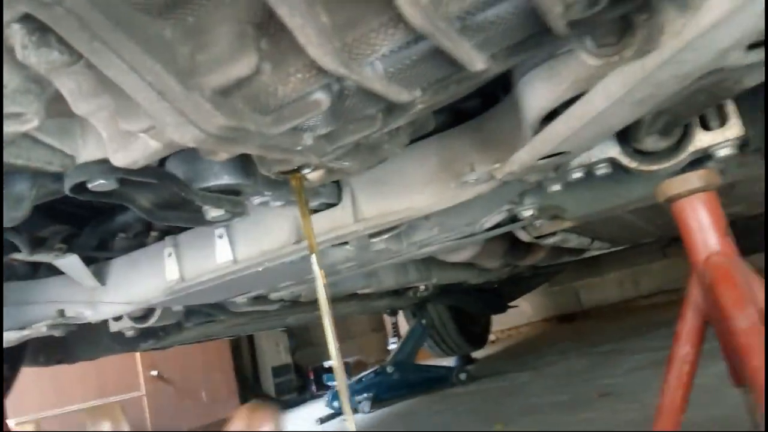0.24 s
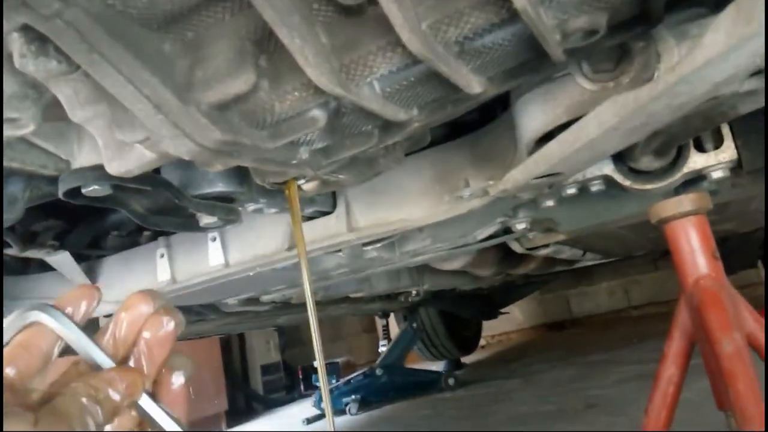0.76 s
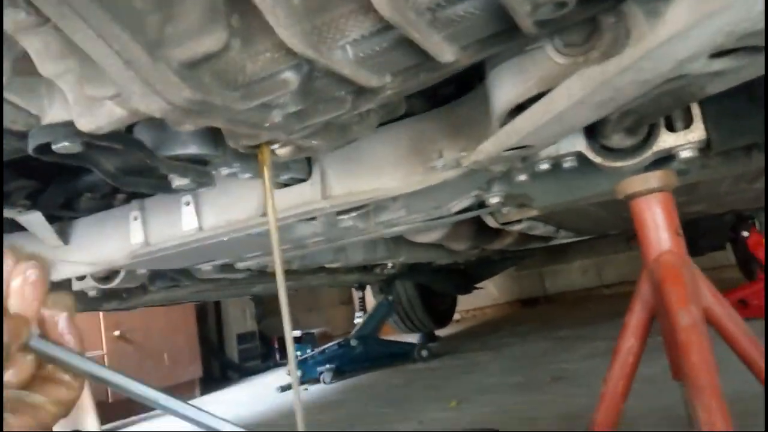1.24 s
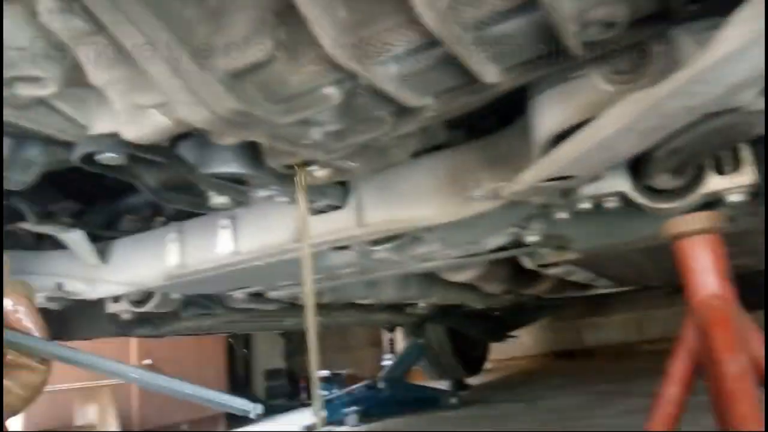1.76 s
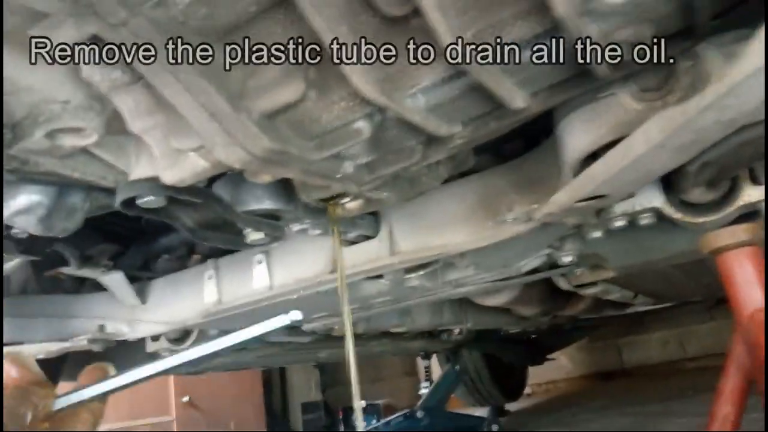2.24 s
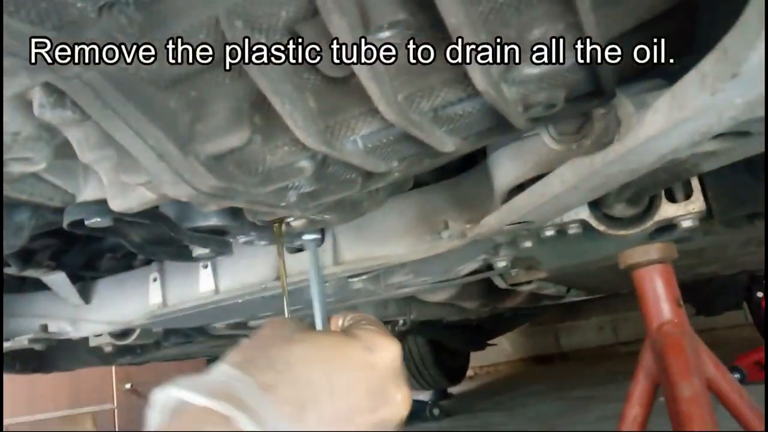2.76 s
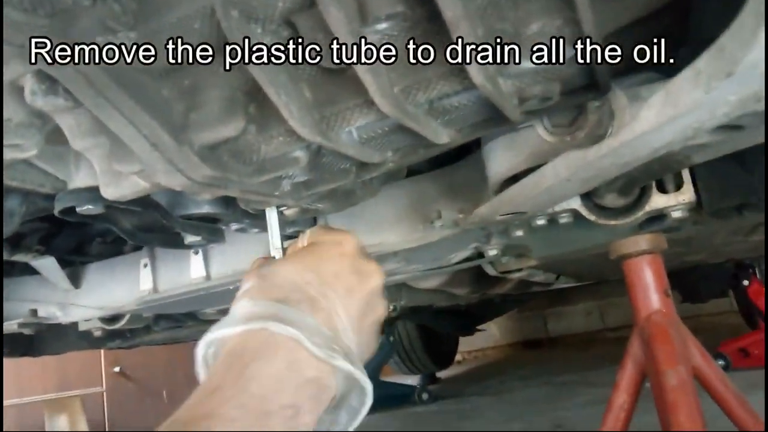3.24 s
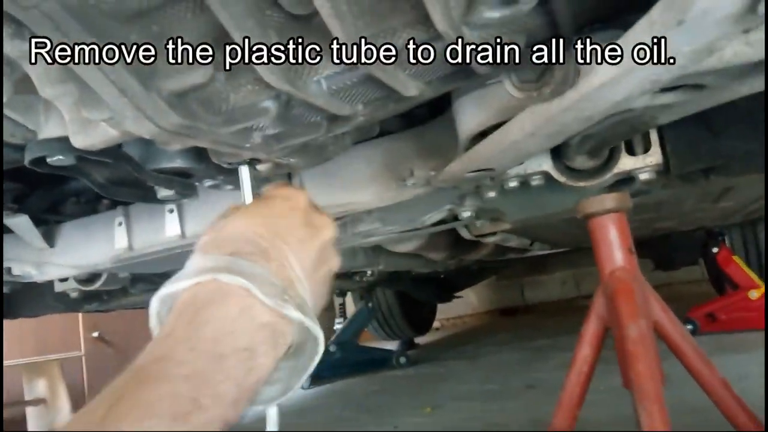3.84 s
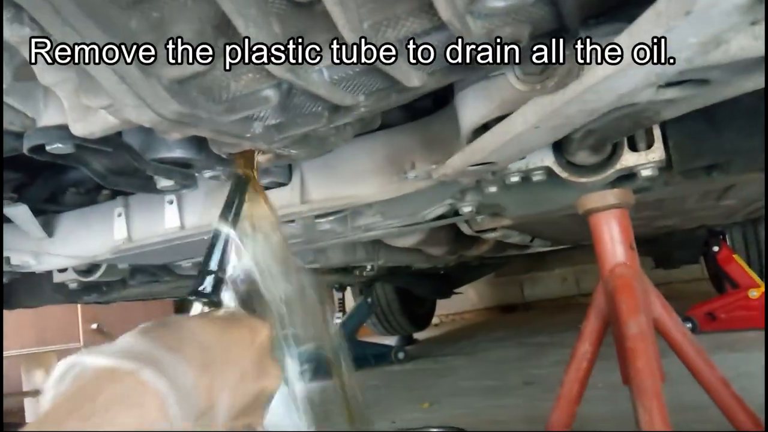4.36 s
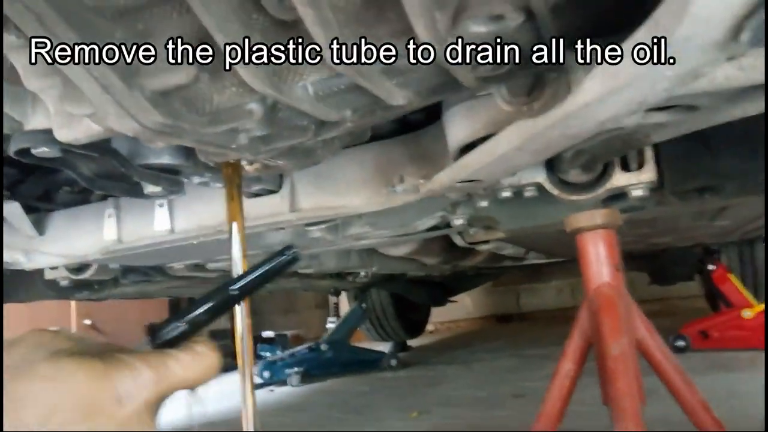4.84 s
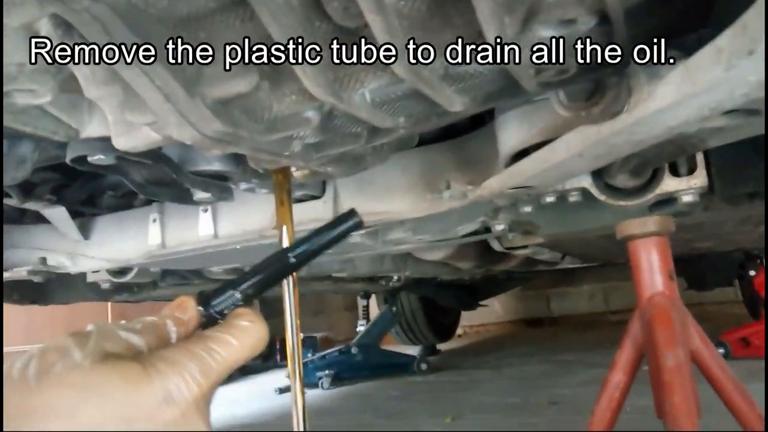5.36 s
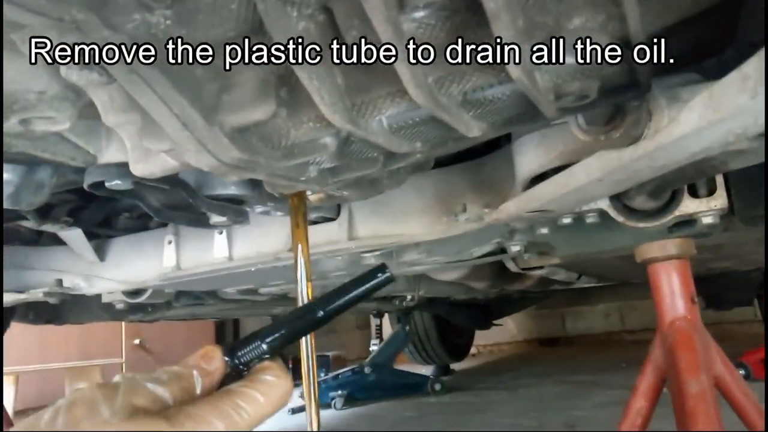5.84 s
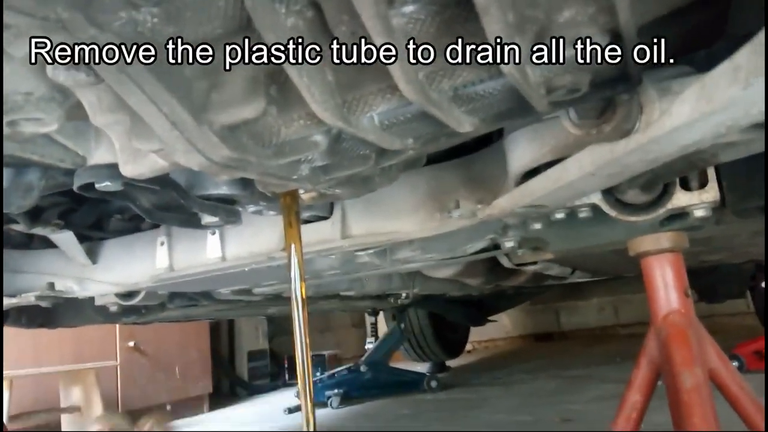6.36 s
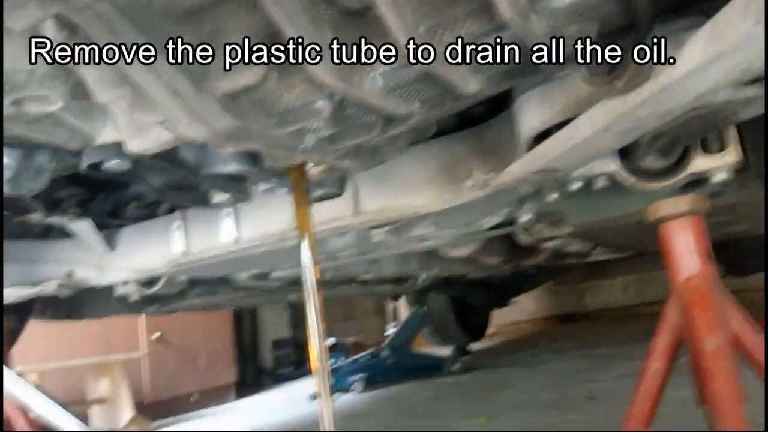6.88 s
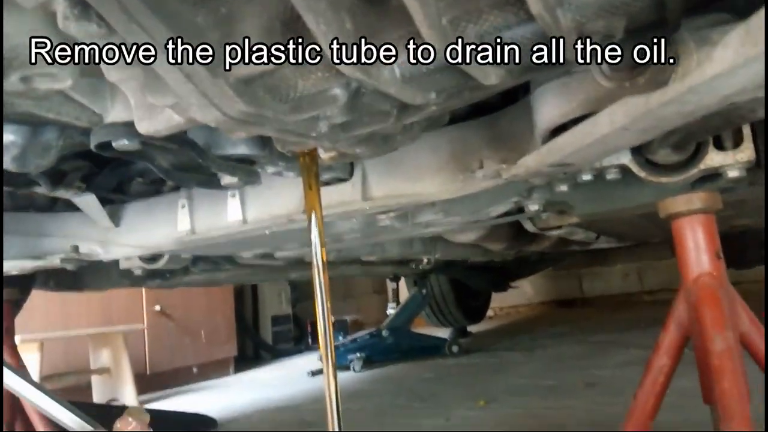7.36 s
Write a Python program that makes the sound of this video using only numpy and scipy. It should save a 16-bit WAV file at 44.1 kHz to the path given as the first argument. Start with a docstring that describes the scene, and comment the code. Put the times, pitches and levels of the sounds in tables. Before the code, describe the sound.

A nearby stereo microphone, fuller in bass on the left, catches oil draining in a small, dull garage. Sharp ticks and splatters swell over a drumming pan, then thin abruptly. After a bright metal clink, faint glove rustles and small scrapes, gritty plastic snaps precede a brief splashy gush. Low plops and bubbles follow, thinning to a quiet pour with slight hiss.

```python
"""In a garage, heard from under a car, oil drains from a gearbox into a pan.
A thin stream fizzes, spatters and drums; a hex key clinks into the drain hole and unscrews a plastic tube.
The tube comes out with a gush, and a thicker stream gurgles and then runs smooth, over a low hum.
The liquid is built from showers of short noise bursts and gliding tones, the pan and key from dying modes,
the tube from gritty noise through resonances, the hand and air from coloured noise, the hum from wavering sines."""
import sys
import numpy as np
from scipy import signal
from scipy.fft import rfft, irfft, next_fast_len
from scipy.io import wavfile

SR = 44100
rng = np.random.default_rng(int(sys.argv[2]) if len(sys.argv) > 2 else 0)


def transcribe(u):
    """Save the signal u as a 16-bit wav file named by the first command-line argument.

    u: samples, shape (n,) or (channels, n), limited to [-1, 1]; the rate is SR.
    q: integer samples, one column per channel.
    """
    v = np.clip(np.atleast_2d(u).T, -1, 1)
    q = np.round(v * 32767).astype(np.int16)
    wavfile.write(sys.argv[1], SR, q)


N = 335851
T = np.arange(N) / SR
SHORT = T[:6000]  # time axis of one short sound

# All levels are relative: the layer trims and the output gain come on top.
# modes of the pan: (frequency [Hz], level [dB], t60 [s])
PAN_MODES = [(256, -7, 0.08), (293, -10, 0.032), (368, -10, 0.054), (829, -5, 0.078), (877, 0.5, 0.051),
             (1036, -1, 0.04), (1156, -10, 0.069), (1490, -15.5, 0.13), (1810, -17, 0.14)]
# colour of splashing oil: (frequency [Hz], level [dB])
SPLASH_COLOUR = [(200, -28), (600, -1), (1100, -3.5), (1600, 2), (6000, 2.5), (10400, 6.5), (12000, -9),
                 (16000, -23)]
# the spatter comes in clumps: depth [dB] and random steps per second
CLUMP_DB, CLUMPS_PER_S = 2.8, 32


def amp(db):
    """Turns decibels into a linear gain."""
    return 10 ** (np.asarray(db) / 20)


def unit(x):
    """Scales to rms 1."""
    return x / np.sqrt(np.mean(x ** 2) + 1e-30)


def add(mix, s, sound):
    """Mixes a stereo sound in at time s."""
    part = mix[:, max(round(s * SR), 0):][:, :sound.shape[1]]
    part += sound[:, :part.shape[1]]


def level(rows):
    """Gain along a dB curve, fading out over 50 ms beyond its ends."""
    s, db = np.transpose(rows)
    beyond = np.maximum(np.maximum(s[0] - T, T - s[-1]), 0)
    return amp(np.interp(T, s, db)) * np.maximum(1 - beyond / .05, 0)


def swells(rows):
    """Gain of smooth swells, each given by its middle, level and length."""
    return sum(amp(db) * np.exp(-(2 * (T - s) / length) ** 2) for s, db, length in rows)


def drift(per_s):
    """A slow random curve of straight lines between normal random knots."""
    knots = rng.standard_normal(2000)
    return np.interp(T * per_s, np.arange(len(knots)), knots)


def decay(t60, rise):
    """A quick rise and an exponential fall."""
    return (1 - np.exp(-(SHORT / rise) ** 2)) * amp(-60 * SHORT / max(t60, .003))


def hump(hz, centre_hz, spread):
    """Gain of a broad resonance, spread in octaves."""
    octaves = np.log2((hz + 1) / centre_hz)
    return (1 + (octaves / spread) ** 2 / np.sqrt(2)) ** -np.sqrt(2)


def colour(x, points, centre_hz=None, spread=1):
    """Filters by a spectrum and, if given, a broad resonance."""
    size = next_fast_len(x.shape[-1])
    hz = np.fft.rfftfreq(size, 1 / SR)
    point_hz, db = np.transpose(points)
    gain = amp(np.interp(np.log(hz + 1), np.log(point_hz), db))
    if centre_hz:
        gain = gain * hump(hz, centre_hz, spread)
    return irfft(rfft(x, size) * gain, size)[..., :x.shape[-1]]


def noise(points):
    """Steady coloured noise, unrelated in the two ports."""
    return unit(colour(rng.standard_normal((2, N)), points))


def ring(modes, rise):
    """Dying modes, each reaching the two ports at its own phase."""
    out = 0
    for hz, db, t60 in modes:
        cycles = hz * SHORT + rng.random((2, 1))
        out = out + amp(db) * decay(t60, rise) * np.sin(2 * np.pi * cycles)
    return out


def shower(grains, per_s, size_db):
    """Each grain falls at random moments with random sizes; rms 1."""
    out = np.zeros((2, N))
    count = max(int(per_s * N / SR / len(grains)), 1)  # the grains share the rate
    for grain in grains:
        draws = rng.random((count, 2))
        clicks = np.zeros(N)
        # a positive size_db makes a few grains stand out, a negative one makes a few fall back
        clicks[(draws[:, 0] * N).astype(int)] = amp(-size_db * np.log(0.0043 + draws[:, 1]))
        out += signal.oaconvolve(clicks[None], grain, axes=1)[:, :N]
    return unit(out)


def tick(hz, spread):
    """A needle-sharp snap of an air pocket, followed by scattered reflections; peak 1."""
    # colour of the snaps: (frequency [Hz], level [dB])
    tick_colour = [(600, -21.5), (1550, 2.5), (2500, 3.5), (4400, 4), (9200, 11.5), (11000, -2.5),
                   (12500, -23), (16000, -28)]
    snap = amp(-60 * SHORT / .0025)
    reflections = .35 * decay(.016, rise=.0006) + .06 * decay(.05, rise=.003)
    burst = rng.standard_normal((2, len(SHORT))) * (snap + reflections)
    burst = colour(burst, tick_colour, hz, spread)
    return burst / abs(burst).max(axis=1, keepdims=True)


def splat(hz, spread, t60):
    """A sharp slap, smeared by close reflections between pan, floor and underbody."""
    slap = 1.5 * decay(.014, rise=.0013)
    burst = rng.standard_normal((2, len(SHORT))) * (slap + decay(t60, rise=0.0029))
    burst = colour(burst, SPLASH_COLOUR, hz, spread)
    return burst / np.sqrt(np.mean(burst[:, :SR // 150] ** 2))  # rms 1 at the onset


def bubble(hz, rise, t60):
    """A ringing pocket of air whose pitch climbs; close reflections break up the glide."""
    octaves = np.minimum(rise * SHORT, 1)  # the bubble is gone after climbing an octave
    phase = 2 * np.pi * np.cumsum(hz * 2 ** octaves) / SR
    tone = (1 - octaves ** 10) * decay(t60, rise=.002) * np.sin(phase)
    echoes = rng.standard_normal((2, len(SHORT))) * decay(.04, rise=.002)
    echoes = echoes / np.linalg.norm(echoes[0])
    echoed = signal.fftconvolve(tone[None], echoes, axes=1)[:, :len(SHORT)]
    return .45 * tone + .8 * echoed


def background():
    """Room air as coloured noise, two motors humming in the building and a faint passing tone."""
    # colour of the room air: (frequency [Hz], level [dB])
    air_colour = [(30, -28.5), (86, -5), (161, -6.5), (303, -15), (364, -10.5), (554, -22), (780, -19.5),
                  (1810, -42), (9700, -40.5), (16000, -50.5)]
    # swells of the lower hum: (middle [s], level [dB], length [s])
    hum_swells = [(4.38, -73, 0.65), (6.35, -69.5, 0.6)]
    passing_tone = [(6.55, -69, .2)]  # (middle [s], level [dB], length [s])
    tones = [(96.5, amp(-76) + swells(hum_swells)),  # (frequency [Hz], gain)
             (116, amp(-72.5)),
             (447, swells(passing_tone))]
    hum = 0
    for hz, gain in tones:
        wavering_hz = hz + 0.94 * drift(per_s=2.6)
        hum = hum + gain * np.sin(2 * np.pi * np.cumsum(wavering_hz) / SR)
    return amp(5.0) * hum + amp(-68) * noise(air_colour)


def rubbing():
    """The gloved hand rubs as it works the key: soft swells of coloured noise."""
    # strokes of the glove: (middle [s], level [dB], length [s])
    rubs = [(0.348, -52.5, 0.055), (.52, -49, 0.17), (2.26, -49, 0.097), (2.588, -59.5, 0.049),
            (3.041, -57.5, 0.03), (3.15, -58.5, 0.12), (3.444, -60, 0.064), (3.58, -60.5, 0.09),
            (3.895, -61, 0.084), (4.029, -57, 0.04)]
    # colour of the rubbing: (frequency [Hz], level [dB])
    rub_colour = [(1500, -19.5), (3300, -11), (6000, -13), (8300, -4), (9800, 5), (10700, -3.5),
                  (11800, -17), (16000, -24)]
    return swells(rubs) * noise(rub_colour)


def tube():
    """Each knock in the seat is a short gritty rasp through the damped resonances of the plastic."""
    # catches and knocks: (time [s], level [dB], rasp length [s], t60 [s], favoured [Hz], spread [octaves])
    knocks = [(2.902, -46, 0.0066, 0.052, 1900, 1.26), (2.922, -56, 0.02, 0.051, 1300, 1.2),
              (4.186, -35, .011, 0.026, 4700, 0.58), (4.278, -36.5, 0.0067, 0.024, 5160, 1.7),
              (4.372, -44.5, 0.0054, 0.078, 7900, 1.13)]
    # broad resonances of the tube: (frequency [Hz], level [dB], spread [octaves])
    tube_modes = [(1090, 1.5, 0.43), (2425, 4, 0.11), (3210, 1.5, 0.063), (4250, -8, 0.17),
                  (6100, 5, 0.097), (9630, -5, 0.25), (13000, -1.5, 0.035)]
    grit_db, grains_per_s, swell_db = 3, 900, 7  # the rasp is gritty and grows, then dies away
    out, hz = np.zeros((2, N)), np.fft.rfftfreq(len(SHORT), 1 / SR)
    body = sum(amp(db) * hump(hz, mode_hz, spread) for mode_hz, db, spread in tube_modes)
    for s, db, length, t60, centre_hz, spread in knocks:
        swell = -swell_db * np.maximum(1 - SHORT / length, 0)
        fall = -60 * np.maximum(SHORT - length, 0) / t60
        roughness = amp(grit_db * drift(grains_per_s)[:len(SHORT)])
        grit = rng.standard_normal((2, len(SHORT))) * roughness
        rasp = unit(irfft(rfft(grit) * body * hump(hz, centre_hz, spread)))
        add(out, s, amp(db + swell + fall) * rasp)
    return out


def key():
    """Each contact with the drain hole is a short scrape that rings the key modes it favours."""
    # contacts: (time [s], level [dB], favoured [Hz], spread [octaves], ring level [dB])
    clinks = [(2.733, -29, 6550, 2.6, 8), (2.966, -42, 6760, 1.15, -31), (2.984, -47.5, 8000, 0.92, -25),
              (3.311, -35.5, 8800, 0.54, -21)]
    # modes of the key: (frequency [Hz], level [dB], t60 [s])
    key_modes = [(3330, -4, 0.067), (5500, -9.5, 0.068), (8450, -3.5, 0.09), (8446, 15.5, 0.025),
                 (11900, -11.5, 0.091)]
    out = np.zeros((2, N))
    for s, db, centre_hz, spread, ring_db in clinks:
        favoured = [(hz, mode_db + 20 * np.log10(hump(hz, centre_hz, spread)), t60)
                    for hz, mode_db, t60 in key_modes]
        body = ring(favoured, rise=.006)
        scrape = amp(-11) * splat(centre_hz, spread, t60=.06)
        add(out, s, amp(db) * (amp(ring_db) * body / abs(body).max() + scrape))
    return out


def hand_work():
    """The key clinks, the glove rubs as it turns, and the tube knocks on its way out."""
    return key() + rubbing() + tube()


def surge(s, db):
    """Gain of one surge of oil: a quick rise, a short hold and a steady fall."""
    rise_s, hold_s, fall_db_per_s = 0.014, 0.026, 607
    falling = np.maximum(T - s - hold_s, 0)
    return np.clip((T - s) / rise_s, 0, 1) * amp(db - fall_db_per_s * falling)


def release():
    """The tube lets go: a wet gush of dense noise bursts, then the soft crackling hiss of a smooth stream."""
    # surges as the tube comes free: (time [s], level [dB])
    surges = [(4.411, -33.5), (4.452, -29.5)]
    # swells of the thick stream's hiss and crackle: (middle [s], level [dB], length [s])
    pours = [(6.88, -67, 0.07), (7.04, -67.5, 0.074), (7.18, -61, 0.076)]
    # colours of the gush and of the smooth stream: (frequency [Hz], level [dB])
    gush_colour = [(50, -16), (350, -3), (600, -14.5), (1200, -7), (2100, 5), (5000, 0.5), (9500, 4),
                   (12000, -13.5), (16000, -30.5)]
    pour_colour = [(1500, -30.5), (3200, -14.5), (4800, 2), (6500, -10), (9500, 0), (12000, -10)]
    bursts = [rng.standard_normal((2, len(SHORT))) * decay(0.014, rise=0.0013) for _ in range(4)]
    wet = shower(bursts, per_s=2101, size_db=-4.5)
    specks = [splat(hz, spread=0.32, t60=0.019) for hz in np.geomspace(3000, 9000, num=6)]
    crackle = shower(specks, per_s=244, size_db=6)
    gush = sum(surge(s, db) for s, db in surges) * unit(colour(wet, gush_colour))
    return gush + swells(pours) * unit(colour(crackle, pour_colour))


def splashes():
    """The larger events: snapping air pockets, slaps of oil, rising bubbles and drops that ring the pan."""
    # loudest air pockets snapping on the oil: (time [s], level [dB])
    loud_ticks = [(0.551, -36), (.655, -25.5), (0.699, -32), (0.81, -46), (.823, -51), (.885, -25.5),
                  (.902, -36), (.918, -21), (0.97, -25), (1.026, -18), (1.133, -18.5), (1.158, -21),
                  (1.285, -18), (1.362, -25), (1.437, -14), (1.866, -22)]
    # loudest slaps of oil in the pan: (time [s], level [dB], centre [Hz], spread [octaves])
    loud_splats = [(.941, -24, 8000, 0.22), (0.986, -19, 8800, 0.19), (1.027, -21.5, 12500, 0.2),
                   (1.156, -17.5, 8970, 0.16), (1.337, -21, 6600, 0.65), (1.445, -16, 5750, 1.5),
                   (1.459, -23.5, 2630, 0.29), (1.498, -16.5, 2800, 0.58), (1.513, -41, 2700, 0.77),
                   (1.541, -15, 4440, 1), (1.6, -13, 5240, 0.32), (1.643, -18, 5400, 0.38),
                   (1.661, -12, 5180, 0.35), (1.768, -20.5, 4400, 0.35), (1.784, -22.5, 2190, 2.3),
                   (1.885, -25, 4080, 2), (1.936, -35.5, 6260, 0.83), (2.007, -35, 2200, 0.88),
                   (2.189, -33, 8300, 0.56), (2.23, -32.5, 2160, 0.51), (2.417, -33, 2270, 0.26),
                   (4.417, -15, 7700, 1.34), (4.522, -29.5, 9200, 0.18), (4.567, -30.5, 1820, 0.33),
                   (4.779, -35, 1630, 0.67), (4.823, -34, 2590, 0.65), (5.011, -37, 2230, 0.42),
                   (5.208, -31.5, 1880, 0.46), (5.337, -36, 2450, 0.33), (5.381, -36, 3930, 0.71),
                   (5.466, -28, 3720, 0.12), (5.484, -35, 1500, 0.6), (5.655, -40.5, 4120, 0.083),
                   (5.804, -36, 3420, 0.33), (5.811, -39.5, 1670, 0.33), (5.942, -36.5, 2480, 0.43),
                   (5.955, -35, 1510, 0.28), (6.007, -40.5, 1310, 0.66), (6.106, -33, 2750, 0.24),
                   (6.107, -41, 3980, 0.1), (6.421, -43, 4900, 0.17), (6.422, -45.5, 2630, .12),
                   (7.583, -48.5, 2620, 0.22)]
    # bubbles rising in pitch as they surface: (time [s], level [dB], pitch [Hz], rise [octaves/s])
    loud_bubbles = [(1.735, -27.5, 1876, 0.72), (1.785, -20, 1746, 13), (1.956, -37.5, 2680, 8),
                    (2.011, -35, 3430, 6.8), (2.111, -39.5, 2940, 7.9), (2.308, -45, 3130, 2.3),
                    (2.485, -41, 5370, 1.1), (2.693, -46, 731, 4), (4.644, -38.5, 1950, 8),
                    (5.144, -40, 1610, 4.6), (5.154, -43, 3095, 3), (5.725, -42, 5520, 2),
                    (6.474, -30, 1615, 75), (6.503, -46, 3010, 11.6), (6.737, -44.5, 3140, 3.2)]
    # heavy drops: (time [s], level [dB], extra level of the deep modes [dB])
    heavy_drops = [(1.714, -26.5, -11), (1.789, -32, -9), (1.987, -43, -6.5), (2.012, -45, -27),
                   (2.135, -41, 6), (2.231, -46.5, 7.5), (2.27, -38.5, -7), (4.57, -45.5, -6),
                   (6.742, -55, -12)]
    out = np.zeros((2, N))
    for s, db in loud_ticks:
        add(out, s, amp(db) * tick(7500, spread=2.7))
    for s, db, hz, spread in loud_splats:
        add(out, s, amp(db - 9) * splat(hz, max(spread, .1), t60=0.074))
    for s, db, hz, rise in loud_bubbles:
        add(out, s, amp(db) * bubble(hz, rise, t60=0.042))
    for s, db, deep_db in heavy_drops:
        modes = [(hz, mode_db + deep_db * (hz < 500), t60) for hz, mode_db, t60 in PAN_MODES]
        add(out, s, amp(db) * ring(modes, rise=0.00085))
    return out


def flow_gains(flow, fizz_db):
    """Gains of the spatter, the fizz and the drumming, from the flow of one stream and its age."""
    full_flow_db = -40  # flow at which fizz_db holds
    fizz_follow, fizz_fade_db_per_s = 0.54, 4  # fizz follows the flow in part and thins out with age
    drum_db, drum_muted_db, drum_build_s = -4, -27.5, 0.59  # drumming starts muted and builds up
    spatter, age = level(flow), np.maximum(T - flow[0][0], 0)
    fizz = amp(fizz_db - fizz_fade_db_per_s * age) * (spatter / amp(full_flow_db)) ** fizz_follow
    drumming = spatter * amp(drum_db + drum_muted_db * np.exp(-age / drum_build_s))
    return np.array([spatter, fizz, drumming])


def thick_stream(spray, pan, glugs):
    """A thick, soft stream: clumps of low round plops, bubbles and small splashes in a wash, with a little fizz."""
    # splash strength once the tube is out: (time [s], level [dB])
    thick_flow = [(4.45, -75), (4.66, -53), (5.05, -51.5), (5.45, -61), (5.85, -65), (6.28, -68.5),
                  (6.55, -86.5), (7.62, -81.5)]
    spatter, fizz, drumming = flow_gains(thick_flow, fizz_db=-40)
    plop_grains = [splat(hz, spread=.16, t60=.045) for hz in np.geomspace(1500, 3100, num=9)]
    plops = shower(plop_grains, per_s=190, size_db=1.9)
    bubble_grains = [bubble(hz, rise=rng.uniform(0, 8), t60=.03) for hz in np.geomspace(1500, 4400, num=8)]
    bubbles = shower(bubble_grains, per_s=60, size_db=1.8)
    splash_grains = [splat(hz, spread=.2, t60=.05) for hz in np.geomspace(3300, 5800, num=5)]
    splashlets = shower(splash_grains, per_s=150, size_db=2.2)
    wash = unit(colour(noise(SPLASH_COLOUR), SPLASH_COLOUR, centre_hz=2500, spread=1))
    gurgle = plops + amp(-10) * bubbles + amp(-7) * splashlets + amp(-3) * wash
    clumps = amp(CLUMP_DB * drift(CLUMPS_PER_S))
    wet = clumps * (amp(-5) * spatter * gurgle + amp(-5) * fizz * spray)
    return wet + amp(4.5) * drumming * (.5 * pan + .5 * glugs)


def thin_stream(spray, pan, glugs):
    """A thin, fast stream: a dense patter of fine ticks and droplets, fizz, and low glugs once the pan drums."""
    # splash strength until the key blocks the stream: (time [s], level [dB])
    thin_flow = [(.3, -95.5), (.55, -53), (.85, -46), (1.6, -39.5), (1.88, -45), (1.92, -64.5), (2.27, -59),
                 (2.5, -72), (2.86, -110.5)]
    spatter, fizz, drumming = flow_gains(thin_flow, fizz_db=-42.5)
    tick_grains = [tick(hz, spread=.5) for hz in np.geomspace(3500, 9000, num=8)]
    patter = shower(tick_grains, per_s=300, size_db=2.8)
    droplet_grains = [splat(hz, spread=.2, t60=.028) for hz in np.geomspace(1400, 6400, num=12)]
    droplets = shower(droplet_grains, per_s=430, size_db=2.4)
    wash = unit(colour(noise(SPLASH_COLOUR), SPLASH_COLOUR, centre_hz=1950, spread=1.0))
    gurgle = droplets * amp(CLUMP_DB * drift(CLUMPS_PER_S)) + amp(-8) * wash
    crackle = patter + .9 * spray
    wet = amp(-4) * spatter * gurgle + amp(1.5) * fizz * crackle
    return wet + drumming * (pan + amp(1.5) * glugs)


def stream():
    """Both streams throw up a fine spray, glug in the pooled oil and drum on the same pan."""
    # colour of the spray: (frequency [Hz], level [dB])
    fizz_colour = [(1000, -39.5), (3000, 1.5), (6300, -8.5), (8200, -6), (9700, -1), (10700, -9),
                   (12000, -8), (16000, -28)]
    spray_grains = [splat(hz, spread=.26, t60=.035) for hz in np.geomspace(6500, 11000, num=7)]
    spray = unit(colour(shower(spray_grains, per_s=380, size_db=4), fizz_colour))
    pan_hits = []
    for _ in range(4):
        modes = [(hz * rng.uniform(1.0, 1.04), db, t60) for hz, db, t60 in PAN_MODES]
        pan_hits.append(ring(modes, rise=0.0025))
    pan = shower(pan_hits, per_s=180, size_db=4.5)
    glug_grains = [splat(hz, spread=.2, t60=.04) for hz in np.geomspace(1000, 2600, num=3)]
    glugs = shower(glug_grains, per_s=110, size_db=2)
    return thin_stream(spray, pan, glugs) + thick_stream(spray, pan, glugs)


def garage(x):
    """A weak, dull tail from the walls: decaying noise with its treble turned down."""
    t = T[:SR // 2]
    tail = rng.standard_normal((2, len(t))) * amp(-60 * t / 0.15) * (1 - np.exp(-t / 0.0051))
    tail = colour(tail, [(300, 6.5), (3000, -8.5), (12000, -4.5)])
    return amp(-30.5) * signal.oaconvolve(x, tail / np.linalg.norm(tail[0]), axes=1)[:, :N]


def scene():
    """The oil and the hand work with their tail from the walls, over the background."""
    near = stream() + splashes() + release() + hand_work()
    return amp(3.5) * (near + garage(near) + background())


def record(dry):
    """The right microphone port hears little bass; both add their own hiss; then the band limit."""
    # sensitivity of the right port against the left: (frequency [Hz], level [dB])
    right_port = [(40, -3), (110, -28), (400, -29.5), (850, -22.5), (1400, -10.5), (2700, -5), (4000, -5.5),
                  (6000, -4.5), (9500, -9.5), (12000, -2)]
    hiss_colour = [(30, -15.5), (100, 1), (400, 1.0), (1500, -3.5), (6000, -1.5), (15000, -10.5)]
    ports = np.array([dry[0], colour(dry[1], right_port)])
    ports = ports + amp(-70.0) * noise(hiss_colour)
    low_pass = signal.firwin(301, 16300, window=("kaiser", 8), fs=SR)  # cutoff [Hz]
    return signal.oaconvolve(ports, low_pass[None], "same")


dry = scene()
out = record(dry)
transcribe(out)
```